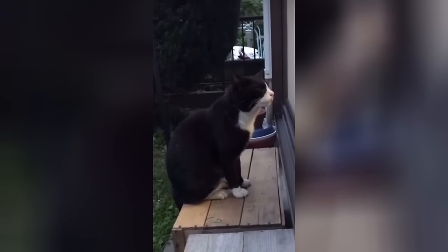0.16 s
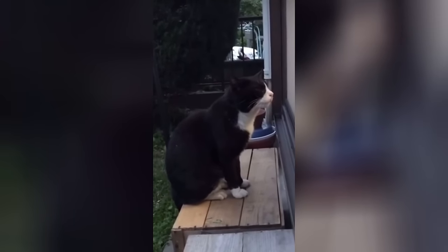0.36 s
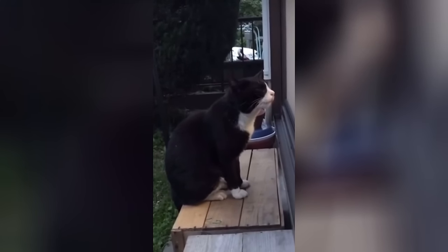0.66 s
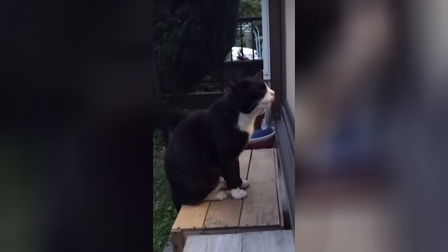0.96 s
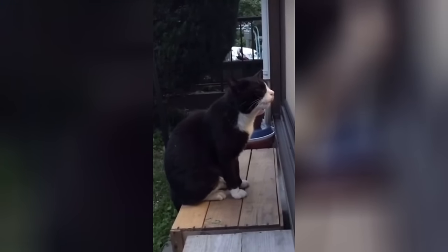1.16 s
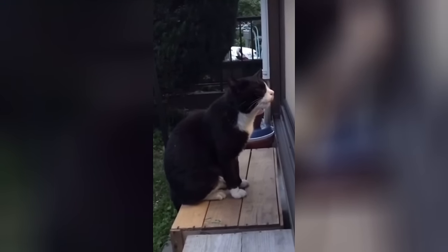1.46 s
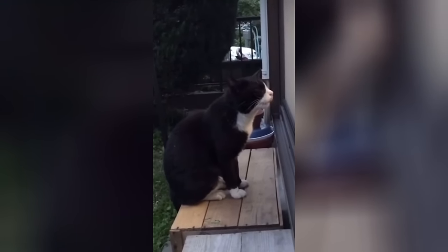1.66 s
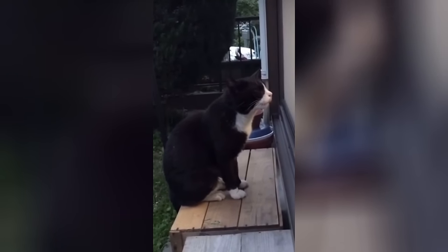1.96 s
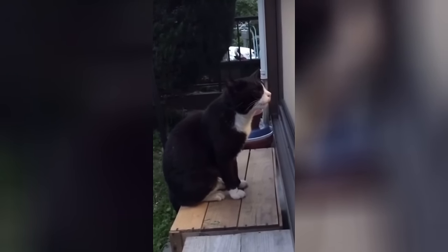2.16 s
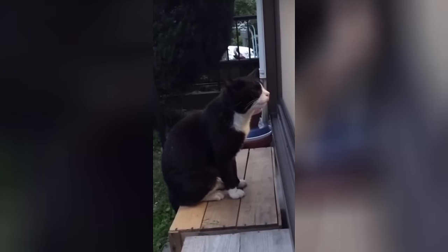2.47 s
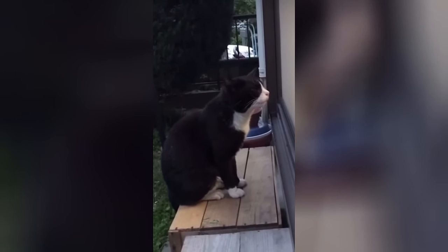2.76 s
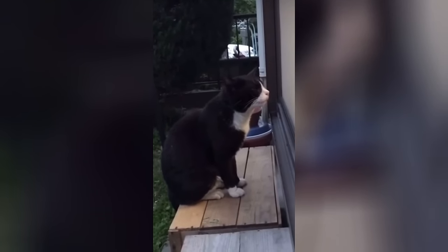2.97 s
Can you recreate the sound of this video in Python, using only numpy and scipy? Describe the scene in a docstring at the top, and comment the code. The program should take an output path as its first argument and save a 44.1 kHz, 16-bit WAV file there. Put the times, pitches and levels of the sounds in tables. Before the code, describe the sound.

A cat gives one long, clear yowl that slowly sinks in pitch, over faint distant traffic.

```python
"""A cat on a porch step gives one long, clear yowl that swells, holds and sinks in pitch, then a small catch in
the throat. The yowl is a stack of partials (tones at whole multiples of one pitch) plus noise for breath.
The catch is three short ringing tones with a spit of noise. The door and walls answer as a short noise echo.
Distant traffic, made from two layers of coloured noise, rumbles and hisses behind it all."""
import sys
import numpy as np
from scipy import signal
from scipy.fft import rfft, irfft, next_fast_len
from scipy.io import wavfile
from scipy.ndimage import uniform_filter1d, map_coordinates

SR = 44100
rng = np.random.default_rng(int(sys.argv[2]) if len(sys.argv) > 2 else 0)


def unload_wav(signal):
    """Save mono or channel-first audio to the path in sys.argv[1] as 16-bit WAV at rate SR, clipped to [-1, 1]."""
    wavfile.write(
        sys.argv[1],
        SR,
        np.round(np.clip(np.atleast_2d(signal).T, -1, 1) * 32767).astype(np.int16),
    )


N = 136710
TIME = np.arange(N) / SR  # seconds


def amp(db):
    """Turn decibels into a plain multiplier."""
    return 10 ** (np.asarray(db) / 20)


def unit(x):
    """Scale a signal to an rms (average strength) of 1."""
    return x / np.sqrt(np.mean(x ** 2) + 1e-20)


def along(points, hz):
    """Read a (frequency [Hz], level [dB]) curve on a log frequency axis; practically silent outside it."""
    f, level = np.transpose(points)
    return np.interp(np.log(hz + 1), np.log(f + 1), level, left=-120, right=-120)


def curves(rows):
    """Give one value per sample for each column after the time, with rounded corners."""
    times, *columns = np.transpose(rows)
    return [uniform_filter1d(np.interp(TIME, times, column), size=400) for column in columns]


def wobble(rate):
    """A smooth random curve through `rate` random points a second."""
    knots = rng.standard_normal(int(N / SR * rate) + 4)
    return map_coordinates(knots, [TIME * rate])


def bump(centre_s, half_s):
    """A smooth rise and fall in time, peaking at 1."""
    return np.exp(-((TIME - centre_s) / half_s) ** 2)


def filtered(x, response):
    """Multiply each frequency in x by the response there."""
    m = next_fast_len(N + SR // 2)
    return irfft(rfft(x, m) * response(np.fft.rfftfreq(m, 1 / SR)), m)[..., :N]


def rush(spectrum, patchy_db):
    """Coloured noise of rms 1, with random louder and softer patches in time and frequency."""
    z = signal.stft(rng.standard_normal(N + 512), nperseg=512)[2]
    patches = uniform_filter1d(rng.standard_normal(z.shape), size=6, axis=0)
    patches = uniform_filter1d(patches, size=14, axis=1)
    noise = signal.istft(z * amp(patchy_db * unit(patches)), nperseg=512)[1][:N]
    return unit(filtered(noise, lambda hz: amp(along(spectrum, hz))))


# how loud the far rumble is, before its slow wobble: (time [s], level [dB])
RUMBLE_LEVEL = [(0.0, -42.5), (0.26, -34), (0.4, -43.5), (0.69, -43.5), (0.7, -42), (3.1, -37)]
# relative colour of the rumble: (frequency [Hz], level [dB per Hz])
RUMBLE = [(12, -32.5), (20, -10), (54, 7), (150, -5.5), (232, -9), (330, -12), (430, -38.5), (730, -120)]
# how loud the hiss is: (time [s], level [dB])
HISS_LEVEL = [(0, -45), (.35, -46), (1.5, -47.5), (2.1, -46), (3.1, -44)]
# relative colour of the hiss: (frequency [Hz], level [dB per Hz])
HISS = [(160, -25), (280, -2.5), (481, -9.5), (746, -12), (840, -7), (1350, -12), (2350, -22), (2650, -30),
        (5390, -31), (6170, -38.5), (15900, -44)]


def traffic():
    """Far traffic blends into noise: a low rumble that wavers in level, under a hiss."""
    rumble_db = curves(RUMBLE_LEVEL)[0] + wobble(2.6)
    rumble = amp(rumble_db) * rush(RUMBLE, patchy_db=-1.0)
    return rumble + amp(curves(HISS_LEVEL)[0]) * rush(HISS, patchy_db=2.5)


# how high the cat sings, before the wavering and the final sag: (time [s], pitch [Hz])
PITCH = [(0.245, 429.9), (0.315, 452.6), (0.385, 465.6), (0.575, 456.1), (0.75, 467.7), (0.8, 468.3),
         (0.89, 458.2), (0.975, 465.1), (1.005, 462.8), (1.06, 466.8), (1.32, 452.6), (1.385, 442.8),
         (1.445, 440.3), (1.475, 433.8), (1.7, 417.0), (1.795, 404.6), (1.865, 398.9), (1.915, 402.3),
         (2.07, 387.1), (2.175, 380.9), (2.265, 380.5), (2.32, 387.0), (2.4, 385.5), (2.445, 379.0),
         (2.485, 382.4), (2.595, 359.0), (2.62, 361.7), (2.655, 357.5), (2.675, 364.5), (2.695, 355.6),
         (2.71, 362.5), (2.825, 363.6), (2.845, 359.6)]
JITTER, JITTER_GROWS_PER_S, JITTER_PER_S = .0004, .0006, 60  # share of pitch, growth as the call tires, knots/s
WAVER, WAVER_PER_S = .0015, 22  # slower unsteadiness: share of pitch, knots/s
SAG_HZ_PER_S = 1370  # as the mouth shuts


def voice_pitch(closing):
    """The pitch in Hz: a main curve, two kinds of unsteadiness, and a sag as the mouth shuts."""
    hz = curves(PITCH)[0] - SAG_HZ_PER_S * closing
    jitter = (JITTER + JITTER_GROWS_PER_S * TIME) * wobble(JITTER_PER_S)
    return hz * (1 + jitter + WAVER * wobble(WAVER_PER_S))


# strength of the five lowest partials, before shimmer and closing:
# (time [s], partial 1 [dB], partial 2 [dB], partial 3 [dB], partial 4 [dB], partial 5 [dB])
VOICE = [(0.232, -27, -24.5, -45.5, -64.5, -42.5), (0.255, -29, -16, -41, -65, -67),
         (0.28, -28.5, -9.5, -40.5, -69, -44), (0.31, -30.6, -14, -34, -42.5, -44),
         (0.37, -30.5, -16, -29, -45, -42), (0.42, -30.5, -18.5, -26, -39.5, -40.5),
         (0.55, -29, -15.5, -25, -33, -35), (0.79, -33, -18.5, -25.5, -42.5, -35.5),
         (0.89, -31.5, -20, -24.5, -37.5, -40.5), (1.06, -33.5, -18.5, -26, -42.5, -39),
         (1.25, -30.5, -20.5, -23.5, -39, -38.5), (1.44, -31.5, -17, -22, -41.5, -47.5),
         (1.49, -31.5, -17, -23, -57, -52.5), (1.57, -30.5, -19.5, -23, -46, -60.5),
         (1.69, -30, -20.5, -22, -43.5, -49), (1.78, -31, -26.5, -24, -42, -65.5),
         (2.03, -30.0, -27, -29, -42.5, -58.5), (2.19, -29, -27, -30.5, -46, -42.5),
         (2.3, -29.5, -25, -31, -50, -52.5), (2.48, -28.5, -25, -30.9, -48.5, -48.5),
         (2.6, -27, -30.5, -38.5, -55, -49.5), (2.85, -27, -31.5, -40, -49, -49)]
LOW_LAG_HZ = 760  # divided by the pitch: radians that low partials trail
DULL_DB_PER_S = 348  # closing mouth: extra fade for each step above the first partial


def low_partials(phase, closing):
    """The body of the voice: five tones; the higher ones fade faster as the mouth shuts."""
    lag = LOW_LAG_HZ / curves(PITCH)[0]
    voice = 0
    for k, db in enumerate(curves(VOICE), start=1):
        gain = amp(db - (k - 1) * DULL_DB_PER_S * closing)
        voice = voice + gain * np.cos(k * phase - (k - 1) ** 2 * lag)
    return voice


# base strength of the overtone bands, to which the colours below are added:
# (time [s], 2.5-4 kHz [dB], 4-6 kHz [dB], centre of that band [Hz], 6.5-8 kHz [dB], above 12 kHz [dB])
OVERTONES = [(0.23, -55, -51, 4420, -67, -77.5), (0.27, -70, -62, 5070, -75.5, -74),
             (0.32, -49.5, -50, 5000, -81, -63), (0.44, -50.5, -42, 4800, -65.5, -67),
             (0.56, -49.5, -43, 4630, -60.5, -69), (0.91, -56.5, -43.5, 5050, -59.5, -63.5),
             (1.42, -53, -41, 5140, -63, -61), (1.91, -61.5, -44.5, 5120, -75.5, -68.5),
             (2.25, -64.5, -49.5, 5060, -80, -70), (2.6, -69, -53, 5060, -73, -72.5),
             (2.85, -68.5, -57, 5200, -71, -72.5)]


def overtone_levels():
    """Middle, treble, edge and top band gains, and the moving centre of the treble band in Hz."""
    middle, treble, centre_hz, edge, top = curves(OVERTONES)
    return amp(middle), amp(treble), amp(edge), amp(top), centre_hz


# colour of throat and mouth in four bands, each: (frequency [Hz], relative level [dB])
MIDDLE = [(1900, 3), (2300, 10), (2800, -2.5), (3200, -14.5), (3800, -16), (4200, -25)]
TREBLE = [(3000, -47), (3700, -24.5), (4150, -15.5), (4600, -12), (5050, -3.5), (5500, -8), (5850, -13),
          (6200, -56)]
EDGE = [(6000, -27), (6500, -9), (6900, -3.5), (7400, -14), (7900, -14.5), (8400, -45.5), (9000, -29.5)]
TOP = [(8000, -39.5), (10700, -15), (11600, -24), (12400, -11), (13300, -19), (14000, -14.5), (15000, -7),
       (15800, -10.5)]
# a narrow throat resonance rings briefly on one overtone:
# (time [s], half length [s], frequency [Hz], level [dB])
RINGS = [(0.279, 0.022, 4410, -47.5), (2.394, 0.087, 4710, -54.5), (2.399, .12, 5450, -55.5)]
RING_WIDTH_HZ = 150
TREBLE_HZ = 5000  # centre for which TREBLE is written
NARROWS = .5  # hoarse voice: stretches the TREBLE dB values, so the resonance tightens
BREATHY_S, BREATHY_RISE_S = 2.49, .05  # the treble overtones give way to air
PARTIALS, LAG = 44, .35  # stop before this partial; radians of trailing, times partial number squared
DRIFT_DB, DRIFT_PER_S = 1.8, 9  # each overtone wanders on its own: size, knots/s


def overtones(hz, phase, closing, bands, hoarse):
    """Partials 6 and up, shaped by throat and mouth as the pitch slides under their resonances."""
    step = slice(None, None, 64)  # work out gains at every 64th sample
    t = TIME[step]
    middle, treble, edge, top, centre_hz = [band[step] for band in bands]
    clear = 1 - np.clip((t - BREATHY_S) / BREATHY_RISE_S, 0, 1)
    tightness = 1 + NARROWS * hoarse[step]
    voice = np.zeros(N)
    for k in range(6, PARTIALS):
        f = k * hz[step]
        treble_db = along(TREBLE, f * TREBLE_HZ / centre_hz) * tightness
        bright = treble * amp(treble_db)
        bright += edge * amp(along(EDGE, f)) + top * amp(along(TOP, f))
        for s, half_s, ring_hz, db in RINGS:
            bright += amp(db) * np.exp(-((t - s) / half_s) ** 2 - ((f - ring_hz) / RING_WIDTH_HZ) ** 2)
        gain = middle * amp(along(MIDDLE, f)) + clear * bright
        drift_db = DRIFT_DB * wobble(DRIFT_PER_S)[step]
        gain *= amp(drift_db - 3.3 * DULL_DB_PER_S * closing[step])
        voice += np.interp(TIME, t, gain) * np.sin(k * phase - k * k * LAG)
    return voice


# relative colour of the low breath: (frequency [Hz], level [dB per Hz])
AIR_LOW = [(500, -44), (800, -19), (1100, 11), (1350, -3), (1700, -20), (2300, -11.5), (2800, -41.5)]
# relative colour of the puff as the mouth opens: (frequency [Hz], level [dB per Hz])
PUFF = [(6000, -35), (6900, 6), (7600, -27), (9000, -28.5), (9700, 6.5), (10600, -9.5), (12000, -29.5)]
PUFF_S, PUFF_HALF_S, PUFF_DB = 0.48, 0.19, -60.5
AIR_LOW_DB = -24.5  # relative to the third partial
AIR_MID_DB, AIR_EDGE_DB, AIR_TOP_DB = -19, -18, -5  # relative to the 5 kHz, 7 kHz and top band gains
AIR_GROWS_DB_PER_S = 3  # the 5 kHz air rises with time
AIR_HIGHER, AIR_NARROW = 1.04, 1.5  # factors on TREBLE: air rings higher and more narrowly
HOARSE_DB = -7  # air relative to the 3 kHz band gain
AIR_PULSED = 0.11  # depth of the pulsing


def breath(phase, bands, hoarse):
    """Air rushing through the throat: noise in six bands, pulsing once each cycle of the voice."""
    middle, treble, edge, top, _ = bands
    third_db = curves(VOICE)[2]
    layers = [
        (amp(third_db + AIR_LOW_DB), AIR_LOW),
        (treble * amp(AIR_MID_DB + AIR_GROWS_DB_PER_S * TIME), np.multiply(TREBLE, [AIR_HIGHER, AIR_NARROW])),
        (edge * amp(AIR_EDGE_DB), EDGE),
        (top * amp(AIR_TOP_DB), TOP),
        (amp(PUFF_DB) * bump(PUFF_S, PUFF_HALF_S), PUFF),
        (middle * hoarse * amp(HOARSE_DB), np.multiply(MIDDLE, [1, .5])),  # halved dB: a flatter colour
    ]
    air = sum(gain * rush(colour, patchy_db=2) for gain, colour in layers)
    return air * (1 + AIR_PULSED * np.cos(phase))


START_S, ATTACK_S, END_S, RELEASE_S = .222, .012, 2.888, .01
CLOSE_S = 2.852  # the mouth starts to shut
HOARSE_S, HOARSE_RISE_S = 1.22, .04  # the voice turns hoarse
SHIMMER_DB = .5  # all partials flicker together


def yowl():
    """The cat's voice: low partials and overtones on one pitch, with breath, between a quick start and end."""
    closing = np.clip(TIME - CLOSE_S, 0, END_S - CLOSE_S)  # seconds since the mouth began to shut
    hoarse = np.clip((TIME - HOARSE_S) / HOARSE_RISE_S, 0, 1)
    hz = voice_pitch(closing)
    phase = 2 * np.pi * np.cumsum(hz) / SR
    bands = overtone_levels()
    voice = low_partials(phase, closing) + overtones(hz, phase, closing, bands, hoarse)
    voice *= np.sqrt(2) * amp(SHIMMER_DB * wobble(60))  # sqrt(2): levels count as rms
    fade_in, fade_out = (TIME - START_S) / ATTACK_S, (END_S - TIME) / RELEASE_S
    sounding = np.clip(np.minimum(fade_in, fade_out), 0, 1)
    return sounding * (voice + breath(phase, bands, hoarse))


PORCH_DB, PORCH_T60_S = -22, .15  # echo level; time to fade by 60 dB


def porch(x):
    """A short, blurred answer from door and walls: the sound smeared by a fading burst of noise."""
    t = np.arange(SR // 4) / SR
    tail = rng.standard_normal(len(t)) * amp(-60 * t / PORCH_T60_S)
    echo = signal.fftconvolve(x, tail / np.linalg.norm(tail))[:N]
    return amp(PORCH_DB) * echo


# throat resonances that ring, with CATCH_DB still to be added:
# (frequency [Hz], level [dB], time to fade by 60 dB [s])
CATCH = [(900, 3, 0.022), (1160, -8, 0.054), (1774, -8.5, 0.11)]
# relative colour of the air that escapes: (frequency [Hz], level [dB per Hz])
SPIT = [(600, -20), (1300, -1), (2300, -7), (3200, -28)]
# relative colour of its longer treble hiss: (frequency [Hz], level [dB per Hz])
HISS_OUT = [(3600, -22), (4400, -4), (4950, -23), (5600, 3), (6100, -30)]
CATCH_S, CATCH_DB, CATCH_RISE_S = 2.876, -26, 0.00081
SPIT_S, SPIT_HALF_S, SPIT_DB = 2.881, .008, -42
HISS_OUT_HALF_S, HISS_OUT_DB = 0.032, -51.5


def throat_catch():
    """The throat shuts: its resonances ring once over a spit of air."""
    after = np.clip(TIME - CATCH_S, 0, None)
    ring = sum(amp(db - 60 * after / t60) * np.sin(2 * np.pi * hz * after) for hz, db, t60 in CATCH)
    ring *= amp(CATCH_DB) * (1 - np.exp(-after / CATCH_RISE_S))
    spit = amp(SPIT_DB) * bump(SPIT_S, SPIT_HALF_S) * rush(SPIT, patchy_db=-5.5)
    hiss_out = amp(HISS_OUT_DB) * bump(SPIT_S, HISS_OUT_HALF_S) * rush(HISS_OUT, patchy_db=4.5)
    return ring + spit + hiss_out


def scene():
    """Mix the traffic, the cat and the porch's answer to the cat."""
    background = traffic()
    cat = yowl() + throat_catch()
    return (background + cat + porch(cat))[None]


TOP_HZ = 15750


def record(dry):
    """Keep only what lies below the top frequency."""
    return filtered(dry, lambda hz: hz < TOP_HZ)


dry = scene()
out = record(dry)
unload_wav(out)
```